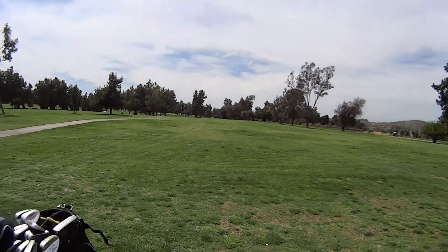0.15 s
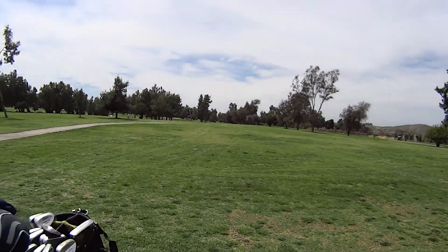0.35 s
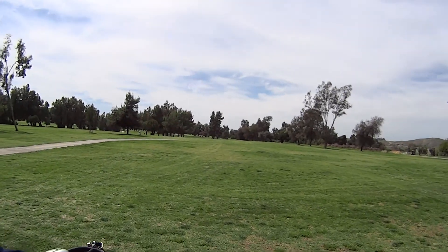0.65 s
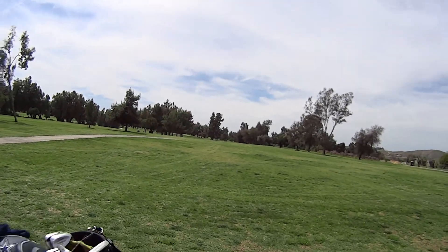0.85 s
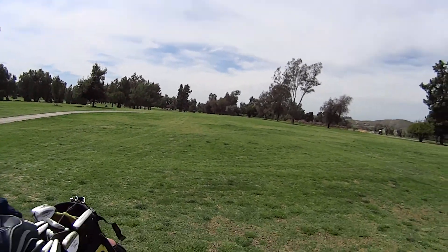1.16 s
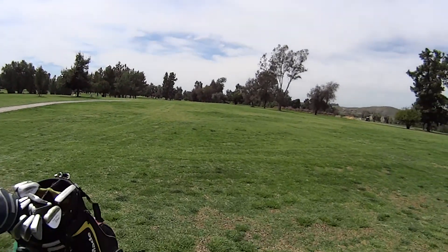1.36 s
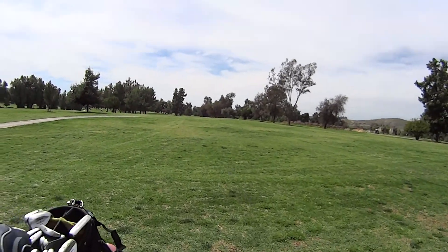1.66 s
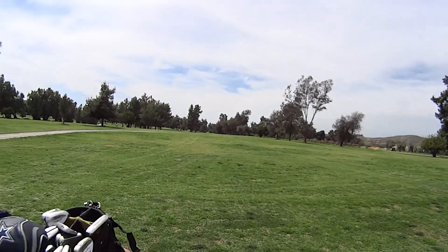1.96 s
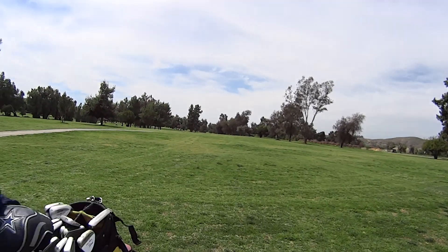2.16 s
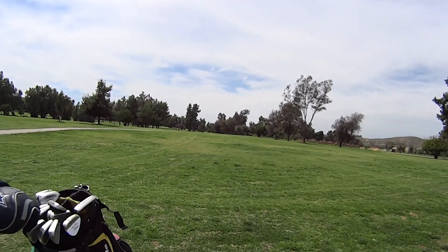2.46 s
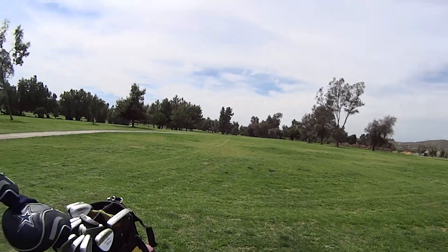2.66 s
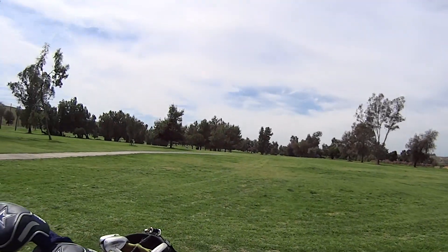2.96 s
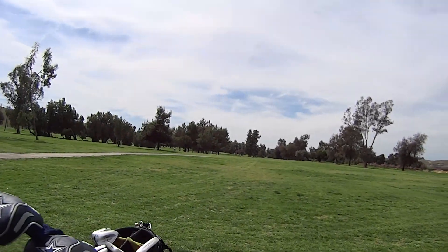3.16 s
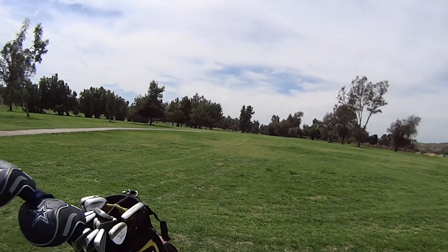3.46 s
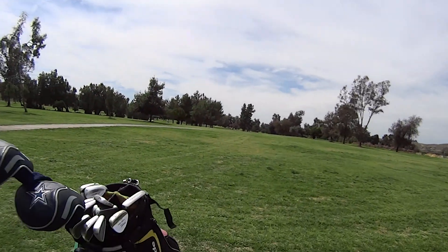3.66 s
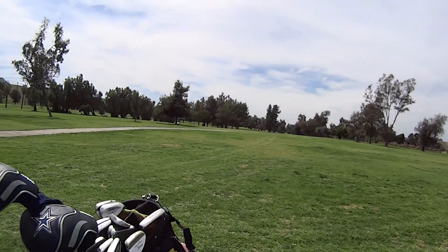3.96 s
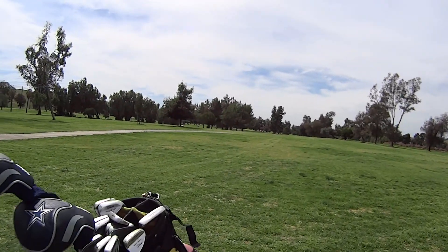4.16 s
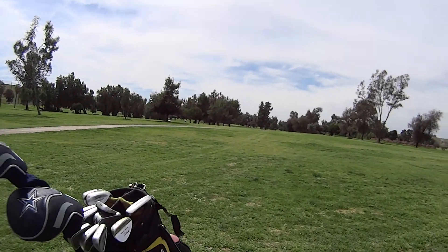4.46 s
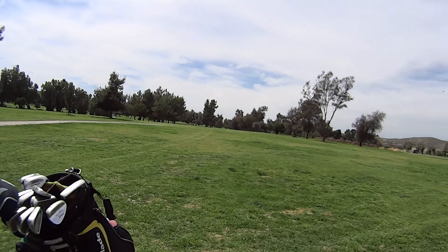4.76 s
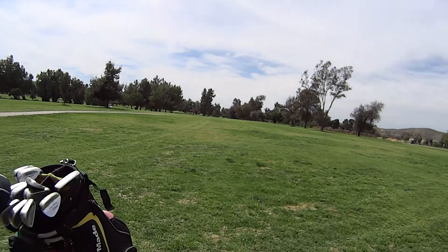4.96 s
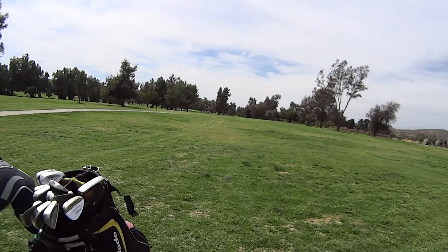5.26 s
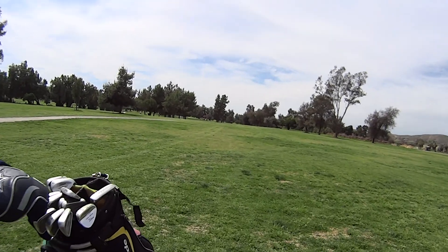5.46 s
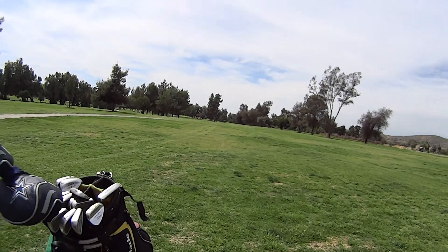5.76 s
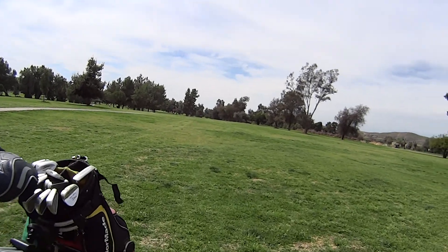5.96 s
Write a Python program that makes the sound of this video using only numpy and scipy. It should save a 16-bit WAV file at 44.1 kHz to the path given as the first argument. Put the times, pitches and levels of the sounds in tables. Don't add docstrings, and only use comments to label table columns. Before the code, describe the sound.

Dry steel clinks and quick chattering rattles from golf clubs in a moving bag, growing sparse, with light fabric rustling, low wind rumble and hiss.

```python
import sys
import numpy as np
from scipy import signal
from scipy.fft import rfft, irfft, next_fast_len
from scipy.io import wavfile
from scipy.ndimage import uniform_filter1d, map_coordinates

SR = 44100
rng = np.random.default_rng(int(sys.argv[2]) if len(sys.argv) > 2 else 0)


def elevation(decibels):
    levels = np.asarray(decibels, float)
    return 10 ** (levels / 20)


def bounce(signal):
    frames = np.transpose(np.atleast_2d(signal))
    limited = np.clip(frames, -1, 1)
    pcm = np.round(limited * 32767).astype(np.int16)
    wavfile.write(sys.argv[1], SR, pcm)


N = 269010
GRAIN = 4096
LEAD_S = 0.004


def unit(x):
    return x / np.sqrt(np.mean(x ** 2) + 1e-20)


def along(points, hz):
    f, v = np.transpose(points)
    return np.interp(np.log(hz + 1), np.log(f + 1), v)


def curves(rows):
    s, *cols = np.transpose(rows)
    return [np.interp(np.arange(N) / SR, s, c) for c in cols]


def columns(rows):
    return [c[:, None] for c in np.transpose(rows)]


def wobble(rate):
    knots = rng.standard_normal(int(N * rate / SR) + 4)
    return map_coordinates(knots, [np.arange(N) * rate / SR])


def filtered(x, response):
    m = next_fast_len(N + 8192)
    return irfft(rfft(x, m) * response(np.fft.rfftfreq(m, 1 / SR)), m)[..., :N]


def noise(spectrum, patchy_db):
    z = signal.stft(rng.standard_normal(N + 512), nperseg=512)[2]
    field = uniform_filter1d(rng.standard_normal(z.shape), size=6, axis=0)
    field = uniform_filter1d(field, size=10, axis=1)
    patchy = signal.istft(z * elevation(patchy_db * unit(field)), nperseg=512)[1][:N]
    return unit(filtered(patchy, lambda hz: elevation(along(spectrum, hz))))


def causal(db, delay_share):
    cepstrum = irfft(np.log(np.maximum(elevation(db), 1e-5)), GRAIN)
    cepstrum[:, 1:GRAIN // 2] *= 2
    cepstrum[:, GRAIN // 2 + 1:] = 0
    log = rfft(cepstrum)
    return np.exp(log.real + 1j * delay_share * log.imag)


def to_peak(rows):
    return rows / np.abs(rows).max(axis=1, keepdims=True)


def placed(rows, start_s):
    at = np.round(start_s * SR).astype(int)[:, None] + np.arange(rows.shape[1])
    return np.bincount(at.ravel(), rows.ravel(), N + SR)[:N]


def ring(t, hz, db, t60, phase=0):
    t = np.maximum(t, 0)
    onset = 1 - np.exp(-t / 0.0003)
    return elevation(db - 60 * t / t60) * onset * np.sin(2 * np.pi * hz * t + phase)


def rustle():
    # (time [s], level [dB])
    swing = [(0, -57.5), (.4, -54.5), (.7, -61), (1.0, -53), (1.4, -49.5), (1.6, -61), (2.0, -55.5),
             (2.4, -61), (2.6, -65), (3.15, -56.5), (3.5, -62), (4.4, -59.5), (4.85, -55.5), (5.0, -55.5),
             (5.2, -69.5), (5.4, -59.5), (6.1, -61)]
    # (frequency [Hz], density [dB per Hz])
    cloth = [(600, -18.5), (1100, -13.5), (1650, -12), (2150, -1.5), (2600, -7.5), (3400, -13.5),
             (4300, -15.5), (5250, -7.5), (6300, -16), (8500, -21), (11000, -16)]
    level_db, = curves(swing)
    grains = elevation(2.4 * wobble(24.955) + 2.8 * wobble(300))
    shared = unit(grains * noise(cloth, patchy_db=1.5))
    apart = unit(grains * noise(cloth, patchy_db=2.5))
    return elevation(level_db - 1.5) * (shared * elevation([[.8], [-.8]]) + 0.51 * apart * [[1], [-1]])


def wind():
    # (time [s], strength [dB])
    gusts = [(0, -56), (.25, -55), (.75, -61.5), (1.5, -55), (1.75, -63), (2.0, -56), (2.25, -66),
             (2.6, -57), (3.05, -66), (3.5, -60.5), (4.0, -65.5), (4.3, -59), (4.5, -67), (4.95, -56.5),
             (5.25, -63), (5.6, -65), (6.1, -60)]
    # (frequency [Hz], density [dB per Hz])
    low = [(10, -31), (25, -1), (42, 4.5), (60, -4.5), (90, -17), (200, -35)]
    # (frequency [Hz], density [dB per Hz])
    upper = [(45, -12), (100, -3), (170, -8), (350, -14.5), (1000, -49)]
    flutter_db, follows, sluggish_s = -6, 1, 0.7
    rumble_db, = curves(gusts)
    mean_db = rumble_db.mean()
    slow_db = uniform_filter1d(rumble_db - mean_db, size=int(sluggish_s * SR))
    flutter_db = mean_db + flutter_db + follows * slow_db
    rumble = noise(low, patchy_db=0.5)
    rumble /= np.sqrt(uniform_filter1d(rumble ** 2, size=9000) + 0.17)
    flutter = elevation(flutter_db - 1 + 1.5 * wobble(14)) * noise(upper, patchy_db=0.9)
    strength = elevation(rumble_db + 1.1 * wobble(7))
    apart = 0.061 * noise(low, patchy_db=-2.0) * [[1], [-1]]
    return strength * (unit(rumble) + apart) + flutter


def hiss():
    # (frequency [Hz], density [dB per Hz])
    common = [(88, -20), (170, -6.5), (500, -4), (1100, -7), (3700, -9.5), (5200, -8.5), (7000, -11),
              (8500, -14.5), (9700, -8.5), (11000, -12.5)]
    # (frequency [Hz], density [dB per Hz])
    difference = [(40, -45), (100, -13.5), (280, -8), (480, -5), (840, -4.5), (2000, -9.5), (11000, -25)]
    mid = elevation(-59.5) * noise(common, patchy_db=1.52)
    side = elevation(-56.0 - 2.5) * noise(difference, patchy_db=1.3)
    return np.array([mid + side, mid - side])


def contacts():
    # (time [s], peak [dB], centre [Hz], contact [ms], turf echo [dB])
    knocks = [(.0646, -23.5, 3660, 0.36, -15), (0.1423, -32, 4280, .94, -7), (0.316, -33, 2960, 0.66, -16),
              (0.493, -31.5, 2600, 0.53, -7), (.524, -31, 4200, 4.3, -3.5), (0.64, -20.5, 4240, 0.41, -13),
              (1.2377, -26.5, 3120, 3, -12), (1.1687, -20.5, 3260, 1.9, -18), (1.1744, -31, 2880, 2.4, -13),
              (1.2131, -18, 4130, 0.21, -24), (1.22, -21, 4940, 0.51, -18), (1.2984, -29, 3160, 1.5, -7),
              (1.3766, -23, 3900, 0.7, -19), (1.4421, -26, 4200, 0.73, -5.5),
              (1.9365, -22.5, 3900, 0.61, -12), (2.0423, -30.5, 3900, 2.6, -12),
              (2.2126, -24.5, 4250, 1.45, -8), (2.2215, -26.5, 4580, 0.65, -4.5),
              (2.3216, -25.5, 3620, 0.47, -23), (2.36, -26.5, 4460, 0.68, -16),
              (3.5705, -27.5, 4200, 1.2, -10), (4.0408, -31, 3700, .91, -4),
              (4.6726, -22.5, 3720, 0.56, -18), (5.2027, -31, 2700, 0.49, -5.5)]
    # (time [s], peak [dB], centre [Hz], first gap [ms], chatter under the knock [dB])
    rattles = [(.1864, -20.5, 4000, 7.1, -16), (.806, -19.5, 4280, 4.84, -7.5),
               (.9552, -22, 5400, 5.1, -7.5), (.9882, -16, 4200, 7.9, -18), (1.1154, -24, 4970, 4.2, -10),
               (1.18, -12.5, 4260, 11, -24), (1.2299, -22.5, 4470, 4, -16), (1.3182, -25, 4400, 4.5, -13),
               (1.3437, -22, 3870, 6.8, -6), (2.1869, -26.5, 3580, 8.3, -14), (2.279, -26, 4200, 7.4, -8.5),
               (2.788, -24.5, 3900, 5.5, -7), (3.0419, -17, 4320, 7, -9.5)]
    # (time [s], peak [dB], centre [Hz])
    touches = [(.0948, -32.5, 4900), (.281, -39.5, 3140), (0.3437, -35, 2900), (0.3736, -38, 2600),
               (.428, -39.5, 5600), (.49, -35.5, 3400), (1.0288, -36, 2780), (.7076, -37, 4200),
               (1.1397, -36, 4300), (1.2551, -35, 4300), (1.3093, -34, 4600), (1.3866, -34, 3520),
               (1.4176, -40, 2600), (1.5078, -39, 4900), (1.7947, -44, 2720), (2.0718, -38.5, 3900),
               (2.1817, -36, 2130), (2.243, -35, 3380), (2.5182, -41, 3600), (2.6823, -36, 5230),
               (2.7458, -33.5, 3830), (3.0727, -33.5, 3800), (3.158, -35.5, 3330), (3.2644, -40, 3700),
               (3.387, -41, 4400), (3.6097, -35, 3500), (3.619, -32, 4560), (3.6637, -39, 3400),
               (4.16, -36.5, 4960), (4.6804, -36, 2700)]
    contact_ms, rattle_echo_db, touch_echo_db = 0.8, -14, -9
    slows, loss_db, dulls = 1.04, 4.5, 0.85
    first = [(s, db, hz, contact_ms, rattle_echo_db) for s, db, hz, _, _ in rattles]
    luck = rng.standard_normal((len(rattles), 4, 3))
    chatter = []
    for (s, db, hz, gap_ms, under_db), draws in zip(rattles, luck):
        for k, (late, size, tone) in enumerate(draws):
            again_s = s + gap_ms / 1000 * ((k + 1) ** slows + .12 * k * late)
            again_db = db + under_db - loss_db * k + 1.26 * size
            chatter.append((again_s, again_db, hz * dulls * np.exp(0.16 * tone)))
    light = [(s, db, hz, 4600 / hz, touch_echo_db) for s, db, hz in [*touches, *chatter]]
    return np.array([*knocks, *first, *light])


def steel_tick(t, hz, chance, db, contact_ms, colour_db):
    scrape_s = np.clip(contact_ms - .45, .05, 3) * 0.00035
    push = chance[:, 0] * np.exp(-.5 * (t / scrape_s) ** 2)
    fizz = chance[:, 1] * np.exp(-np.maximum(t, 0) / 0.0026) * (t > -scrape_s)
    edge_db = np.maximum(-6 - 22 * contact_ms, -26)
    edge_db = edge_db - np.maximum(db + 16.5, 0)
    treble_db = -70 * np.log2((hz[None] + 50) / 9500) ** 2
    edge = to_peak(irfft(rfft(fizz) * causal(treble_db, 1), GRAIN))
    return to_peak(irfft(rfft(push) * causal(colour_db, 0.63), GRAIN)) + elevation(edge_db - 3.5) * edge


def turf_echo(t, chance, echo_db, grass_db):
    lag_s = 0.0043
    smear = chance[:, 1] * np.exp(-.5 * ((t - lag_s) / 0.00037) ** 2)
    return elevation(echo_db) * to_peak(irfft(rfft(smear) * causal(grass_db[None], 0.36), GRAIN))


def jangle(t, chance, echo_db, colour_db, grass_db):
    # (frequency [Hz], t60 [s])
    decay = [(1500, 0.11), (2500, 0.041), (5000, 0.024), (10000, 0.038)]
    f, frame, z = signal.stft(chance[:, 1:4], SR, nperseg=64)
    fade = elevation(-60 * np.maximum(frame - LEAD_S, 0) / along(decay, f)[:, None])
    shake = signal.istft(z * fade, SR, nperseg=64)[1][..., :GRAIN]
    shake = shake * (1 - np.exp(-np.maximum(t, 0) / 0.0032))
    shake = irfft(rfft(shake) * causal(0.52 * colour_db + 0.14 * grass_db, 1)[:, None], GRAIN)
    shake_db = 1.5 + .4 * (echo_db[:, None] + 12)
    return shake * elevation(shake_db) / np.linalg.norm(shake[:, :1], axis=2, keepdims=True)


def shaft_modes(t, centre_hz, chance):
    # (frequency [Hz], level [dB], t60 [s])
    shafts = [(1600, 0, 0.05), (2057, -1, 0.071), (2400, -10, 0.036), (3140, 1, 0.0057), (3230, 2, 0.018),
              (3900, -3, 0.013), (5170, 3, 0.03), (5740, 5, 0.014)]
    luck = chance[:, 4].reshape(len(chance), 4, -1, 1)
    total = 0
    for k, (hz, level_db, t60) in enumerate(shafts):
        off_centre_db = 9 * np.log2(hz / centre_hz) ** 2
        mode_db = level_db + 1.04 * luck[:, 1, k] - 20.5 - off_centre_db
        total = total + ring(t, hz * (1 + 0.028 * luck[:, 0, k]), mode_db, t60, 3 * luck[:, 2, k])
    return total


def heads():
    # (time [s], frequency [Hz], level [dB])
    rings = [(.066, 2100, -44), (0.187, 1500, -49.5), (.316, 2470, -37.5), (.49, 2070, -44),
             (.525, 2060, -43.5), (0.64, 1990, -40.5), (.989, 3060, -30.5), (1.028, 1550, -46),
             (1.116, 2230, -41), (1.298, 2350, -38), (1.343, 1570, -45), (1.388, 2270, -39),
             (1.938, 2490, -36), (2.042, 2400, -45), (2.28, 2390, -37.5), (2.746, 2360, -42),
             (3.571, 2450, -48), (4.672, 2410, -32.5), (5.202, 3110, -35), (5.207, 1590, -47),
             (5.208, 2900, -42), (2.886, 3150, -47), (4.333, 2470, -48.5), (5.549, 2470, -48),
             (2.187, 2530, -41), (3.61, 2550, -43)]
    s, hz, db = columns(rings)
    t60 = 88 / hz
    return placed(ring(np.arange(GRAIN) / SR, hz, db, t60), s[:, 0])


def clubs():
    # (frequency [Hz], density [dB per Hz])
    steel = [(600, -37), (1250, -16.5), (1550, -6.5), (2060, 0), (2800, -4), (3100, -2.5), (3600, -3),
             (5300, -2.5), (6300, -5.5), (7400, -5), (8500, -14.5), (11000, -37)]
    # (frequency [Hz], left over right [dB])
    bag_side = [(1100, -21.5), (2100, 7.5), (3600, 1.5), (6500, 3.5), (10000, 10)]
    s, db, centre_hz, contact_ms, echo_db = contacts().T[..., None]
    t, hz = np.arange(GRAIN) / SR - LEAD_S, np.fft.rfftfreq(GRAIN, 1 / SR)
    chance = rng.standard_normal((len(s), 5, GRAIN))
    patches_db = 3 * unit(uniform_filter1d(chance[:, 4, -len(hz):], size=60, axis=1))
    colour_db = along(steel, hz) + patches_db - 11 * np.log2((hz + 50) / centre_hz) ** 2
    grass_db = along(steel, hz) - 14 * np.log2((hz + 50) / 2200) ** 2
    tick = steel_tick(t, hz, chance, db, contact_ms, colour_db)
    echo = turf_echo(t, chance, echo_db, grass_db)
    shake = jangle(t, chance, echo_db, colour_db, grass_db)
    modes = shaft_modes(t, centre_hz, chance)
    start_s = s[:, 0] - LEAD_S
    shared = placed(elevation(db) * (0.85 * tick + echo + shake[:, 0] + modes), start_s - .0001) + heads()
    ports = [shared + placed(elevation(db) * .55 * shake[:, port], start_s) for port in (1, 2)]
    return filtered(np.array(ports), lambda f: elevation(along(bag_side, f) * [[.5], [-.5]]))


def bumps():
    # (time [s], knock [dB], thud [dB])
    hits = [
        (1.918, -38, -42),
        (4.938, -41, -45.5),
    ]
    # (frequency [Hz], level [dB], t60 [s], delay [s])
    body = [(1400, 5.5, 0.0096, 0.0015), (750, -5, 0.017, 0.0091), (480, -2.5, 0.052, 0.0033),
            (248, -2.5, 0.036, 0.0067), (129, -1.5, 0.11, 0.0056)]
    # (time [s], frequency [Hz], level [dB])
    fingers = [(.426, 310, -46), (.922, 480, -48), (.922, 830, -50), (1.062, 347, -50), (1.068, 750, -51),
               (1.981, 1060, -49.5), (1.99, 750, -53), (4.403, 1500, -51.5), (5.466, 1400, -54)]
    s, knock_db, thud_db = columns(hits)
    t = np.arange(GRAIN) / SR
    knock = sum(ring(t - delay, hz, knock_db + db, t60) for hz, db, t60, delay in body[:2])
    thud = sum(ring(t - delay, hz, thud_db + db, t60) for hz, db, t60, delay in body[2:])
    tap_s, tap_hz, tap_db = columns(fingers)
    taps = placed(ring(t, tap_hz, tap_db, 0.034), tap_s[:, 0])
    return (placed(knock + thud, s[:, 0]) + taps) * elevation([[-1], [1]])


def scuff():
    # (time [s], level [dB])
    long_drag = [
        (4.575, -67),
        (4.605, -55),
        (4.66, -56.5),
        (4.675, -43.5),
        (4.7, -45.5),
        (4.75, -53),
        (4.772, -68),
    ]
    # (time [s], level
    # [dB], half length [s])
    swishes = [(1.784, -54, 0.019), (2.467, -64, 0.063), (2.557, -60.5, 0.059), (3.27, -60, 0.041),
               (4.133, -56.5, 0.047), (4.472, -58, .02), (4.855, -63, .02), (5.157, -51.5, 0.0036),
               (5.179, -59, 0.018), (5.286, -58, 0.018), (5.324, -58, 0.028), (5.573, -58.5, 0.023)]
    # (frequency [Hz], density [dB per Hz])
    drag_colour = [(300, -22), (1200, -16), (1800, -9), (2200, 1.5), (2600, -12.5), (3500, -12.5),
                   (6000, -15.5), (8500, -24.5), (11000, -22.5)]
    before, after = (long_drag[0][0] - .02, -90), (long_drag[-1][0] + .02, -90)
    level_db, = curves([before, *long_drag, after])
    t = np.arange(N) / SR
    strength = elevation(level_db + 1.0)
    for s, db, half_s in swishes:
        strength = strength + elevation(db) * np.exp(-((t - s) / half_s) ** 2)
    flutter = elevation(1.2 * wobble(120))
    shared, apart = (unit(flutter * noise(drag_colour, patchy_db=2)) for _ in range(2))
    return strength * (shared * elevation([[1.5], [-1.5]]) + 0.38 * apart * [[1], [-1]])


def scene():
    return clubs() + bumps() + rustle() + scuff() + wind() + hiss()


def band_limit(x):
    return signal.sosfilt(signal.butter(12, 12360, fs=SR, output="sos"), x)


def record(dry):
    top_hz = 11025

    def edge(hz):
        return np.where(hz < top_hz, 1, elevation(-40 - 3 * (hz - top_hz) / 1000))

    return band_limit(filtered(dry, edge))


dry = scene()
out = record(dry)
bounce(out)
```